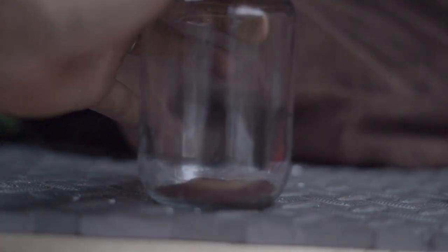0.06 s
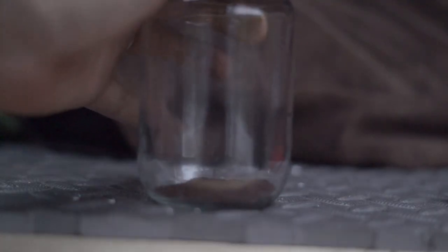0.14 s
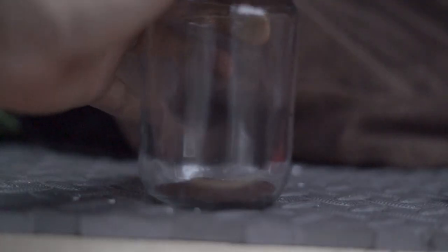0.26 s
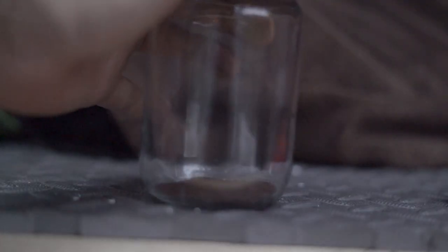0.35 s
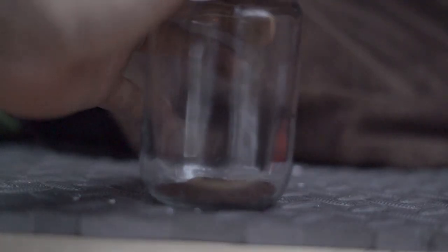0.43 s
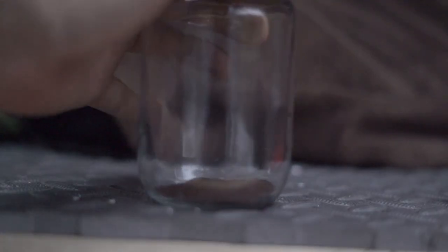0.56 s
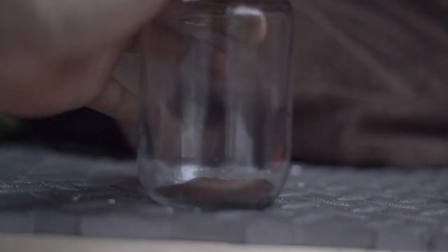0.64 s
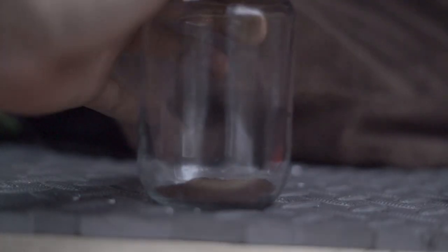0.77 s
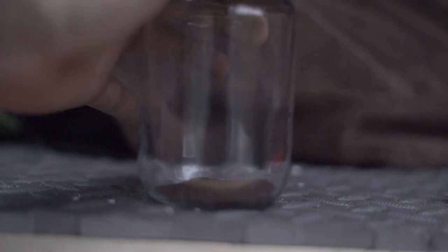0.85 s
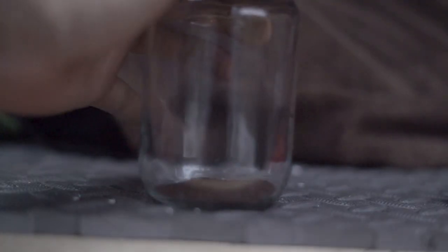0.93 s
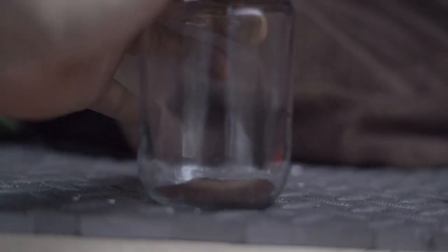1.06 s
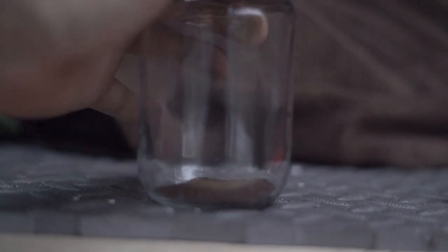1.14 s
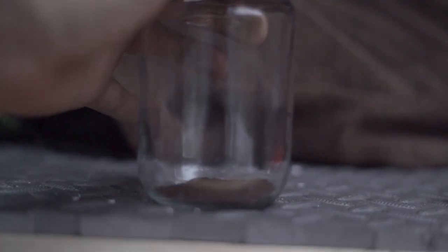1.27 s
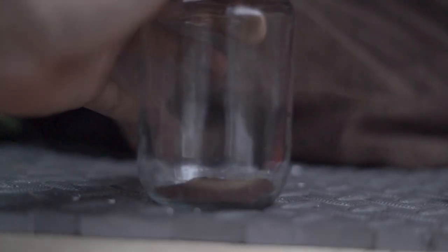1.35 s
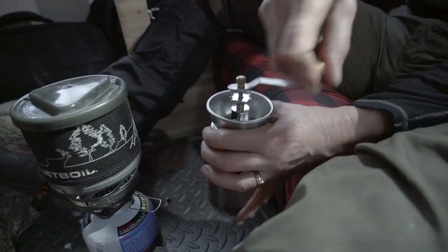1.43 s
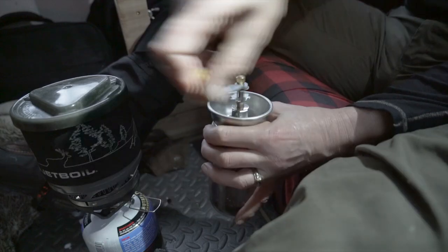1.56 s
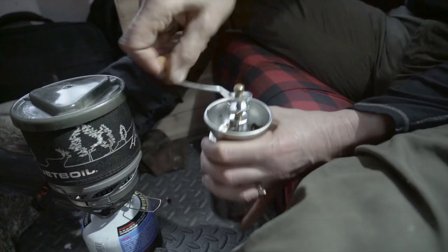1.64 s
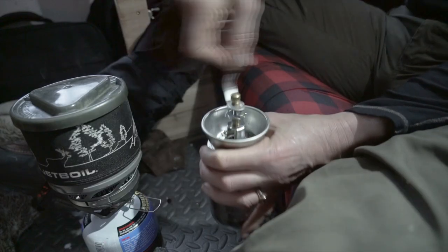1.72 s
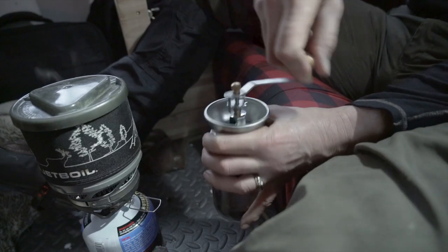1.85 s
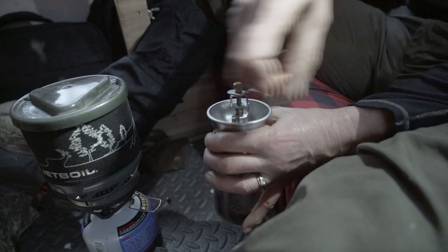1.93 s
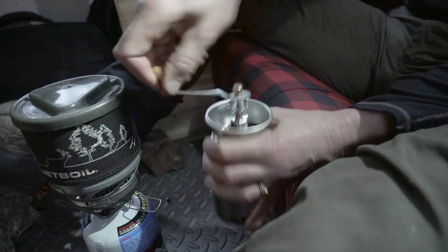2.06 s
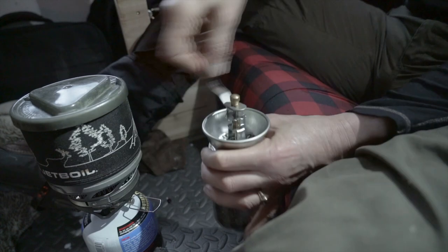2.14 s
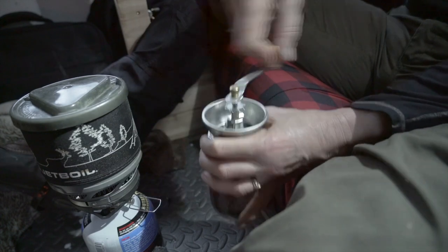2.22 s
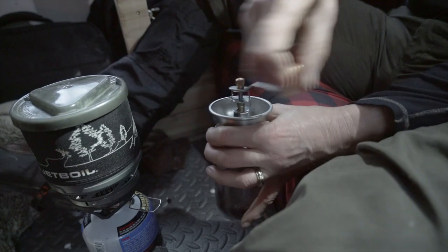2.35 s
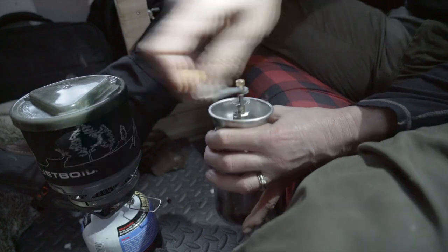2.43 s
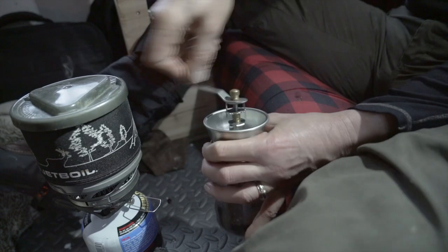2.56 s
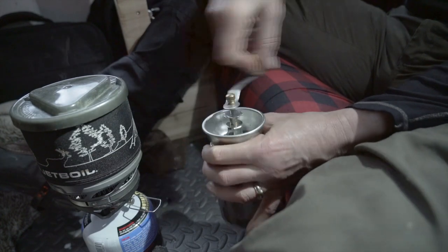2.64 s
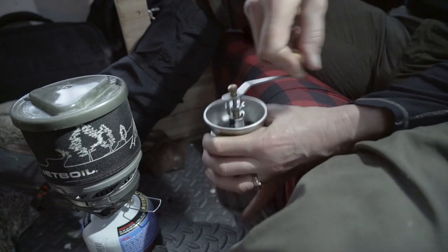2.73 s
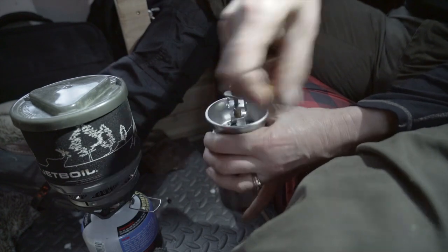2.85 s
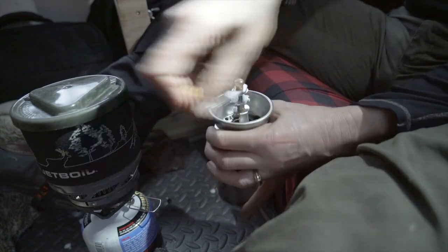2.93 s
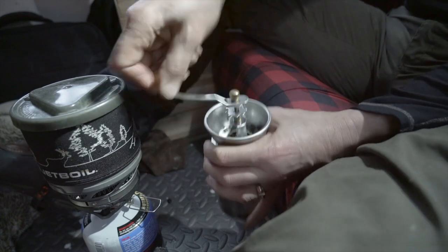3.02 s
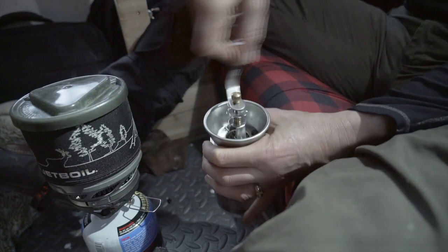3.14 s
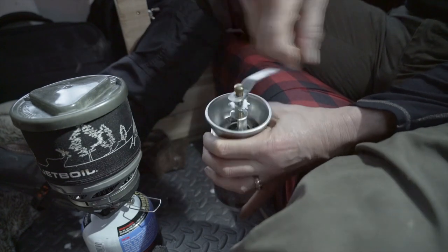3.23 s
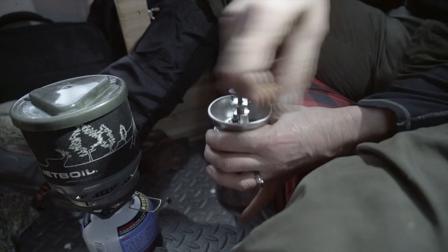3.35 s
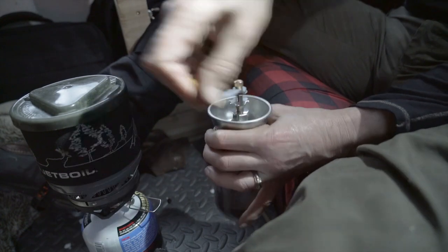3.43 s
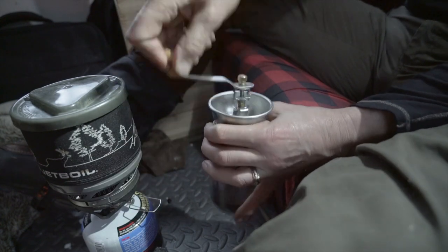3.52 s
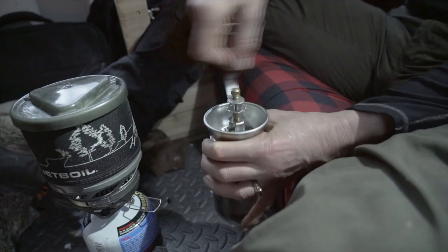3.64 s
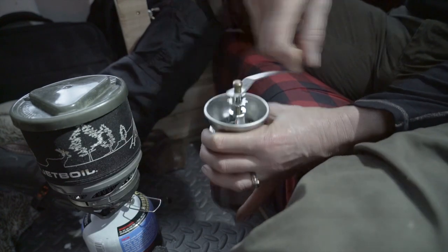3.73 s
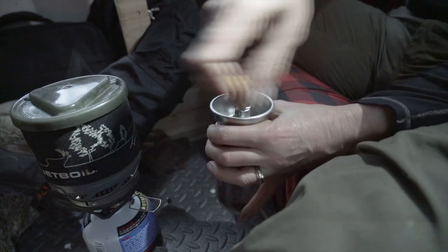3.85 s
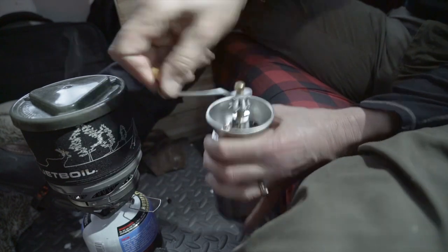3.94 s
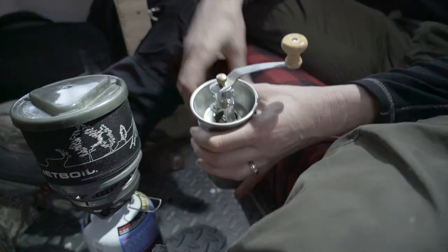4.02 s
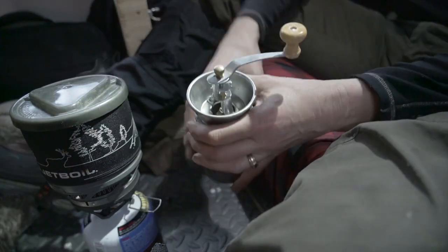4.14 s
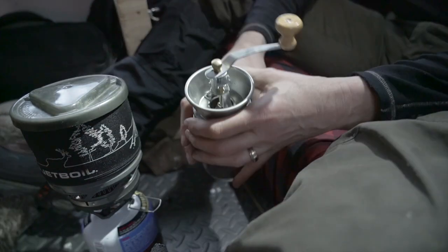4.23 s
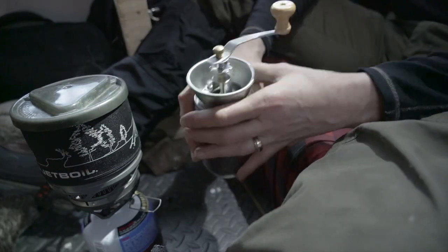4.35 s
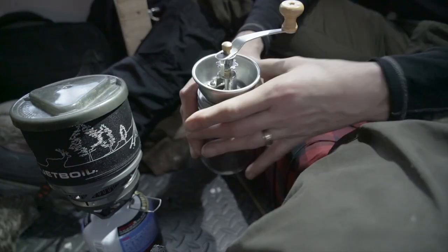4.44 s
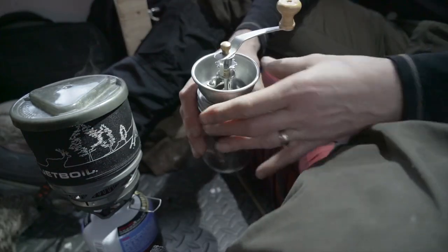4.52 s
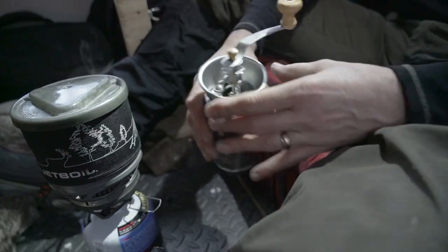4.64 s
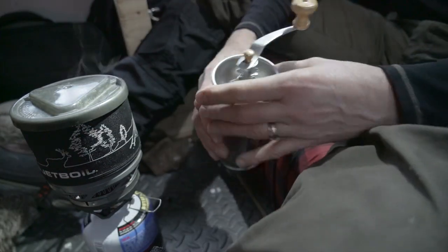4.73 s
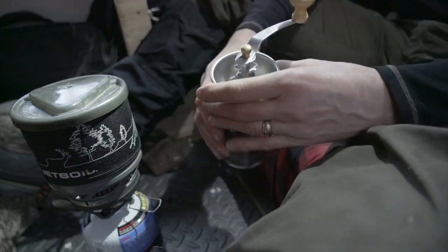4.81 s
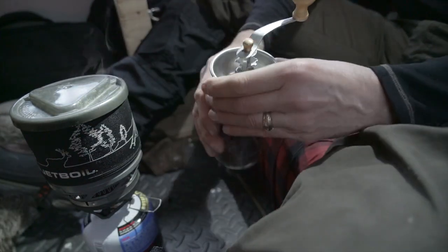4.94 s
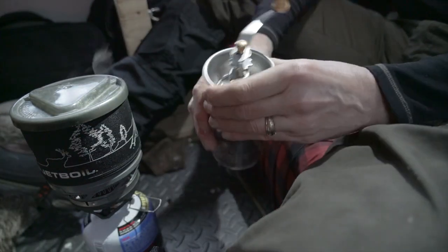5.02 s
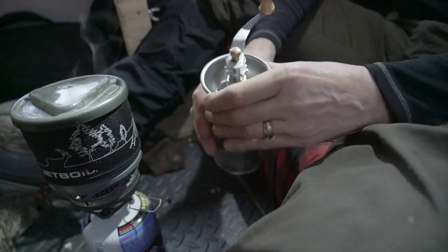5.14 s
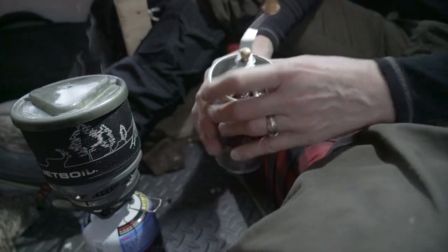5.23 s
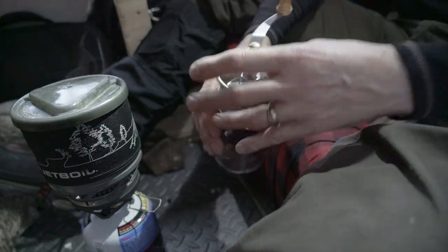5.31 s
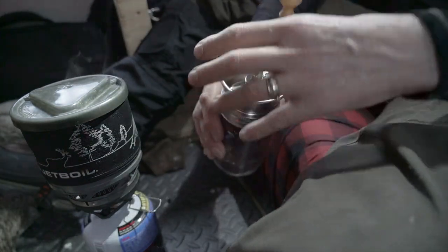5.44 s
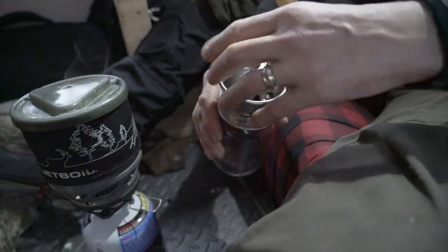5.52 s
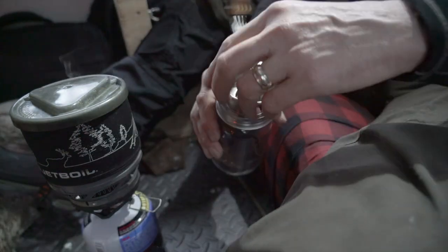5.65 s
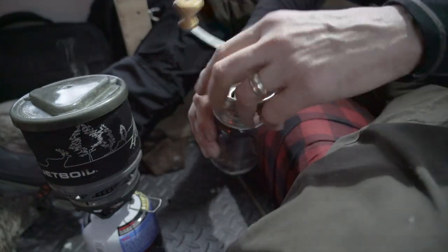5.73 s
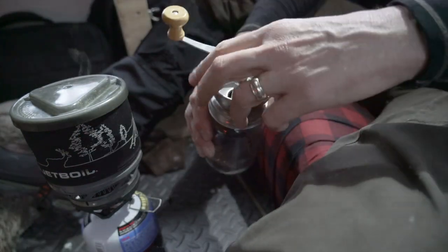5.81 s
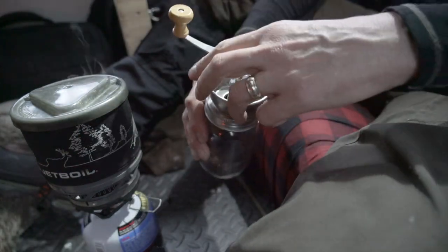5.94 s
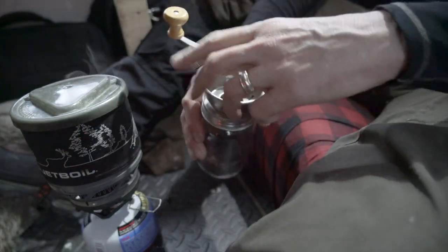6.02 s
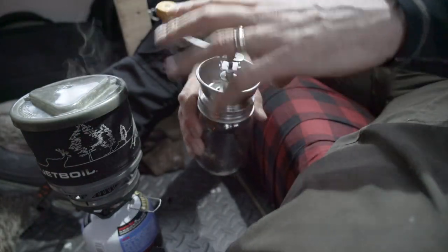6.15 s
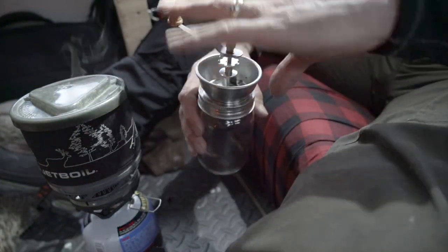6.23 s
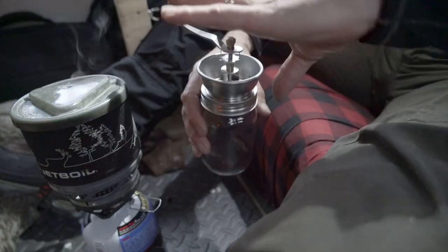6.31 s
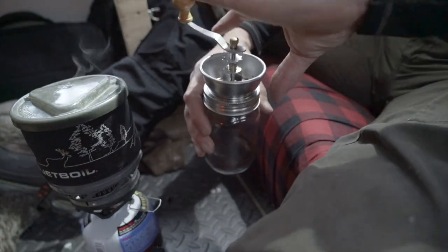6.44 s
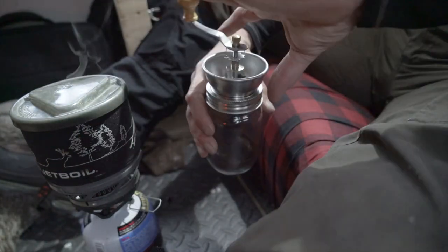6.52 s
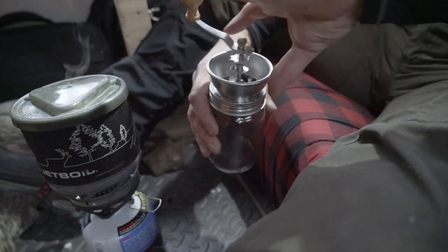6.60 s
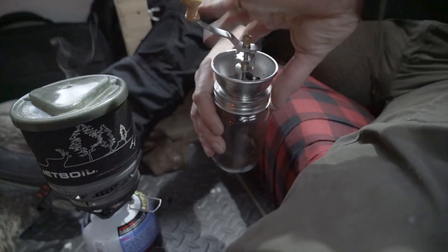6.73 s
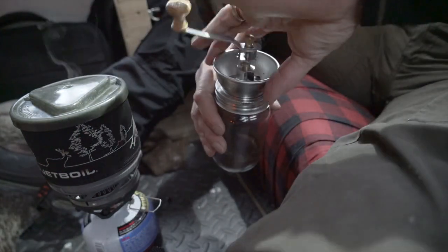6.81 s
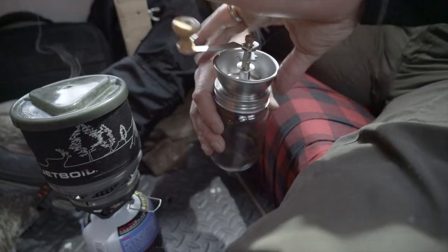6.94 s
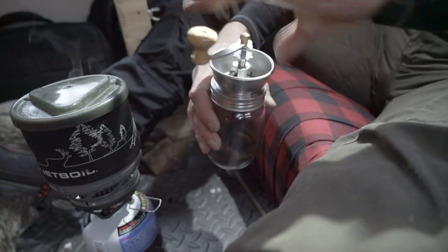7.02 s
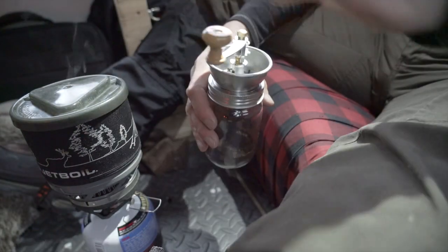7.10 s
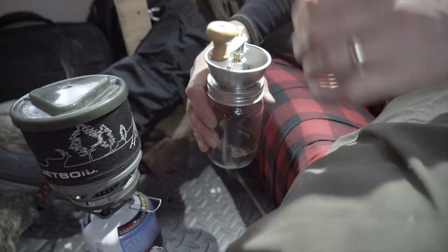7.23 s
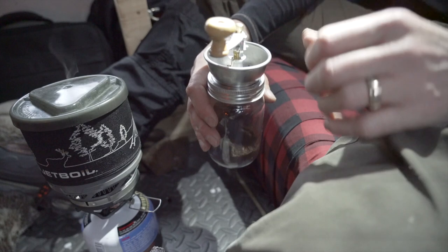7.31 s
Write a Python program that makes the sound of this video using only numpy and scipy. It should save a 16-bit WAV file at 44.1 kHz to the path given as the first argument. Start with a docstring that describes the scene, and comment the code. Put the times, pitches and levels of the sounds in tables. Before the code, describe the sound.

Close by in a small camper with a quiet, steady rumble, coffee beans crunch and snap in a hand mill, the tone wavering with each turn of the crank. The grinding ends a little past halfway, leaving a soft brush of skin and cloth. Then a gritty thread sticks and slips as the metal top twists off the glass jar, which clinks, thuds softly and rings now and then.

```python
"""Grinding coffee in a camper

A hand-crank mill on a glass jar crunches and cracks coffee beans over the camper's low rumble, first
standing on the floor, then held in the lap. Cranking stops, hands and sleeves rustle, and the metal
top is unscrewed in turns: the thread scrapes, the air in the jar thuds, and knocks ring the glass."""
import sys
import numpy as np
from scipy import signal
from scipy.fft import rfft, irfft
from scipy.io import wavfile
from scipy.ndimage import uniform_filter1d

SR = 44100
rng = np.random.default_rng(int(sys.argv[2]) if len(sys.argv) > 2 else 0)


def file_out(sig):
    """Save sig as 16-bit WAV at sys.argv[1]."""
    # one column per channel
    cols = np.atleast_2d(sig).T
    # limit, then scale
    lim = np.clip(cols, -1, 1)
    pcm = np.round(lim * 32767).astype(np.int16)
    wavfile.write(sys.argv[1], SR, pcm)


N = 325017
TIME_S = np.arange(N) / SR
LIFT_S = 1.43  # the mill leaves the floor


def gain_of(db):
    """Turn decibels into a number to multiply by."""
    return 10 ** (np.asarray(db) / 20)

def evened(x):
    """Scale a sound to an average strength (RMS) of 1."""
    return x / np.sqrt(np.mean(x ** 2) + 1e-20)

def drift(size):
    """A random wobble; a bigger size, in samples, makes it slower."""
    return evened(uniform_filter1d(uniform_filter1d(rng.standard_normal(N), size), size))

def wavering(depth_db, size):
    """Noise whose level wavers at random."""
    return rng.standard_normal(N) * gain_of(depth_db * drift(size))

def swell(rise_s, fade_s, count):
    """A quick rise, then a fall. Here and below, fade_s is the time to drop by 60 dB."""
    t = np.arange(count) / SR
    return (1 - np.exp(-t / rise_s)) * gain_of(-60 * t / fade_s)

def colour(x, tone):
    """Make each pitch louder or softer as a tone table says, with no ringing ahead of a hit."""
    pitch_hz, level_db = np.transpose(tone)
    hz = abs(np.fft.fftfreq(8192, 1 / SR))
    curve_db = np.interp(np.log(hz + 1), np.log(pitch_hz + 1), level_db)
    log_gain = np.log(gain_of(np.maximum(curve_db, -90)))
    taps = np.fft.ifft(np.exp(np.conj(signal.hilbert(log_gain)))).real[:4096]
    return signal.oaconvolve(x, taps)[:len(x)]

def resonate(x, hz, width_hz):
    """Ring at one pitch; a narrower width rings longer."""
    r, c = np.exp(-np.pi * width_hz / SR), np.cos(2 * np.pi * hz / SR)
    return signal.lfilter([2 * (1 - r), -2 * (1 - r) * r * c], [1, -2 * r * c, r * r], x)

def glide(x, hz, width_hz):
    """Ring at a moving pitch: shift the sound down, smooth it, shift it back."""
    spin, r = np.exp(2j * np.pi * np.cumsum(hz) / SR), np.exp(-np.pi * width_hz / SR)
    return 2 * (spin * signal.lfilter([1 - r], [1, -r], x / spin)).real

def wandering(x, rings, shift_hz=0):
    """Moving fingers shift and damp each ringing note in its own random way."""
    out = np.zeros(N)
    for hz, width_hz, db in rings:
        strength = gain_of(db + 3 * drift(size=1200))
        pitch_hz = hz * (1 + 0.015 * drift(size=2000)) + shift_hz
        out += strength * evened(glide(x, pitch_hz, width_hz))
    return out

def split(x, at_hz=4900):
    """Separate a sound into its lower body and its treble."""
    filters = (signal.butter(2, at_hz, kind, fs=SR, output="sos") for kind in ("low", "high"))
    return [signal.sosfilt(sos, signal.sosfilt(sos, x)) for sos in filters]

def grains(per_s, spread_db, fade_s, clump_db, alike, kinds=8):
    """Big and small snaps in random clumps; alike is the share that sound like their neighbours."""
    clumps = drift(size=500)
    snaps = gain_of(spread_db * np.minimum(rng.exponential(1, N), 3.5) + clump_db * clumps)
    snaps *= rng.random(N) < per_s / SR
    neighbours = np.repeat(rng.integers(0, kinds, N // 900 + 1), 900)[:N]
    kind = np.where(rng.random(N) < alike, neighbours, rng.integers(0, kinds, N))
    bumps = evened(uniform_filter1d(rng.standard_normal((kinds, 451)), size=9))
    pitched = irfft(rfft(rng.standard_normal((kinds, 900))) * gain_of(2.2 * bumps))
    spectra = rfft(pitched * swell(fade_s / 8, fade_s, 900))
    # each kind favours its own pitches, but together they favour none
    shapes = irfft(spectra / np.sqrt(np.mean(abs(spectra) ** 2, axis=0)))
    shapes /= np.linalg.norm(shapes, axis=1)[:, None]
    return evened(sum(signal.oaconvolve(snaps * (kind == k), shapes[k])[:N] for k in range(kinds)))

def cabin(x, echo_db, fade_s):
    """Add the short, dense echoes of a small padded cabin."""
    t = np.arange(6000) / SR
    tail = rng.standard_normal(6000) * gain_of(-60 * t / fade_s) * (t > .002)
    return x + gain_of(echo_db) * signal.oaconvolve(x, tail / np.linalg.norm(tail))[:N]

def by_place(floor, lap):
    """One value while the mill stands, another once it is lifted."""
    return np.where(np.arange(N) < LIFT_S * SR, floor, lap)


# tone of the camper's background: pitch_hz, level_db
CAMPER_TONE = [(12, -58), (20, 0.5), (150, 4.5), (590, -26), (1660, -24), (2260, -68), (3440, -15.5),
               (5380, -27), (13200, -29), (16000, -65)]
def camper():
    """A steady low rumble with a faint hiss."""
    return gain_of(-52.5) * evened(colour(rng.standard_normal(N), CAMPER_TONE))

# tone of the mill on the floor and in the lap: pitch_hz, level_db
FLOOR_TONE = [(240, -20), (400, -19), (687, -25), (1530, -7.5), (2290, -9.5), (2750, -1.5), (3400, 2.5),
              (4180, -4), (4800, -20.5), (5690, -16.5), (12700, -24), (16000, -35)]
LAP_TONE = [(180, -20), (300, -25.5), (494, -23), (1030, -8), (1900, -4.5), (2140, -5), (3580, 7.5),
            (4020, 1.5), (4910, -8), (8940, -11), (16000, -21)]
# ringing notes of the hopper (the bean holder) and jar: pitch_hz, width_hz, level_db
MILL_RINGS = [(2890, 40, -21), (3085, 35, -20), (3549, 28, -8.5), (4030, 50, -21), (5515, 40, -25),
              (5660, 70, -27), (7865, 45, -29), (9280, 35, -32), (12600, 500, -31), (1430, 43, -30),
              (210, 34, -27.5)]
def hopper_and_jar(x):
    """The mill's body shapes the snaps; in the lap its tone changes and its ringing is damped."""
    standing = by_place(floor=1, lap=0)
    on_floor = 0.45 * evened(colour(x * standing, FLOOR_TONE))
    in_lap = 1.23 * evened(colour(x * (1 - standing), LAP_TONE))
    rings = sum(gain_of(db) * evened(resonate(x, hz, width_hz)) for hz, width_hz, db in MILL_RINGS)
    return on_floor + in_lap + gain_of(by_place(floor=5, lap=-3)) * rings

# how full the grinding teeth are, heard as crunch: time_s, level_db, relative_treble_db
CRUNCH = [(0, -22, -14.5), (0.35, -25, -13.5), (0.44, -27.5, -16), (0.5, -23, -15.5), (0.765, -21.5, -13),
          (0.84, -26.5, -13), (1.015, -26.5, -13), (1.1, -22.5, -12.5), (1.38, -24, -13),
          (1.44, -24, -12.5), (1.68, -23.5, -15.5), (1.74, -28, -17), (1.95, -27.5, -11),
          (2.01, -30.5, -20), (2.115, -25, -10), (2.22, -30.5, -15), (2.3, -30, -13.5), (2.6, -23, -14),
          (2.79, -34.5, -16), (2.87, -25, -14), (2.955, -30, -16), (3.01, -25.5, -14), (3.24, -27, -16),
          (3.29, -26, -8.5), (3.5, -25.5, -17.5), (3.88, -27, -23), (3.95, -26.5, -8), (4.055, -24.5, -24)]
# ringing notes of the hopper gripped in the lap: pitch_hz, width_hz, level_db
GRIP_RINGS = [(3080, 200, -4), (3600, 160, -6), (3900, 140, -8)]
def grinding():
    """Beans crush into grit, fragments and bright chips; in the lap each crank turn bends the ringing."""
    times_s, levels_db, trebles_db = np.transpose(CRUNCH)
    level_db, treble_db = np.interp(TIME_S, times_s, levels_db), np.interp(TIME_S, times_s, trebles_db)
    cranking = uniform_filter1d(1. * (TIME_S <= times_s[-1]), size=90)
    turn_s, hand_nearest_s, swing_hz = 0.49, 2.986, 93
    shift_hz = swing_hz * np.cos(2 * np.pi * (TIME_S - hand_nearest_s) / turn_s)
    grit = grains(per_s=2500, spread_db=2, fade_s=0.01, clump_db=1.33, alike=.6)
    fragments = grains(per_s=300, spread_db=4.5, fade_s=0.0091, clump_db=-3, alike=.6)
    crunch = cabin(grit + gain_of(-6.5) * fragments, echo_db=-15, fade_s=0.07)
    chips = grains(per_s=150, spread_db=2.6, fade_s=0.003, clump_db=3, alike=0)
    chips = cabin(chips, echo_db=-7, fade_s=0.03)
    chips = split(split(chips)[1])[1]  # keep only the treble
    body, treble = split(hopper_and_jar(crunch + gain_of(by_place(floor=-2.5, lap=-2)) * chips))
    gripped = wandering(colour(crunch, LAP_TONE), GRIP_RINGS, shift_hz)
    body = evened(body) + by_place(floor=0, lap=1) * gripped
    return cranking * gain_of(level_db) * (evened(body) + gain_of(treble_db) * evened(treble))

# tone of the low shaking: pitch_hz, level_db
SHAKE_TONE = [(12, -38), (20, -19), (60, 6), (167, -2), (252, -18), (335, -6), (600, -71.5)]
def jar_shake():
    """The cranked jar passes on a lumpy rumble, with one low bump during the last crank turn."""
    cranking = TIME_S < CRUNCH[-1][0]
    level = uniform_filter1d(cranking * gain_of(by_place(floor=-36.5, lap=-53)), size=2000)
    bump_s, half_length_s = 3.8, 0.08
    level += gain_of(-41) * np.exp(-((TIME_S - bump_s) / half_length_s) ** 2)
    return level * evened(colour(wavering(depth_db=3, size=900), SHAKE_TONE))

# the loudest beans breaking: start_s, level_db, relative_treble_db
BEAN_CRACKS = [(0.299, -26, -25), (0.731, -19, -23), (0.759, -9, -15), (1.063, -21, -11.5),
               (1.115, -11.5, -23), (1.176, -13, -2), (1.433, -7, -11), (1.584, -11.5, -9), (1.62, -18, 9),
               (1.668, -10.5, 1.5), (1.688, -14.5, -6), (1.826, -11.5, -10), (1.88, -16, -6),
               (1.902, -14, -8), (1.958, -10, -15), (2.097, -16.5, -10), (2.119, -14, -10),
               (2.252, -15.5, -9), (2.29, -14, -2), (2.646, -13.5, -19), (2.715, -10, -14),
               (2.827, -18, -10), (2.847, -21, -5), (2.879, -14, -17), (2.921, -14, -3), (2.997, -13, -15),
               (3.004, -7.5, -10.5), (3.035, -13.5, -7), (3.216, -10, -17), (3.274, -19.5, 5),
               (3.4, -17.5, -25), (3.458, -9, -12), (3.49, -20, -4), (3.563, -6, -13), (3.943, -15, -4),
               (3.962, -13.5, -9), (3.988, -13, -4)]
def bean_cracks():
    """A whole bean splits: a short, rough burst through the mill, with a quicker rise in the treble."""
    out, count = np.zeros(N), 1500
    bursts = rng.standard_normal((len(BEAN_CRACKS), count))
    for (start_s, level_db, treble_db), burst in zip(BEAN_CRACKS, bursts):
        body = split(colour(burst * swell(0.00092, 0.011, count), LAP_TONE))[0]
        treble = split(colour(burst * swell(0.00043, 0.011, count), LAP_TONE))[1]
        crack = body / abs(body).max() + gain_of(treble_db) * treble / abs(treble).max()
        out[round(start_s * SR):][:count] += gain_of(level_db) * crack
    return cabin(out, echo_db=-11, fade_s=0.05)

# jolts that make the air in the jar boom: start_s, level_db, pitch_hz
JAR_THUDS = [(0.763, -29, 328), (5.015, -36, 157), (5.071, -36, 200), (5.271, -36, 207), (5.331, -36, 252),
             (5.546, -34, 191), (5.732, -26.5, 202), (5.775, -30, 210), (5.825, -29.5, 163),
             (5.887, -35, 194), (6.196, -29, 203), (6.229, -26.5, 206), (6.292, -31, 190),
             (6.333, -33, 166), (6.463, -36, 204), (6.551, -34, 173), (6.614, -21.5, 164),
             (6.631, -28, 205), (6.816, -27.5, 235), (6.923, -32.5, 178), (6.996, -29.5, 206),
             (7.048, -27.5, 220), (7.156, -36, 235)]
def jar_thuds():
    """The jolted air sounds a low note that dies fast, plus a shorter, hollow one."""
    count, hollow_hz = 4000, 563
    out, t = np.zeros(N + count), np.arange(count) / SR
    hollow = gain_of(-6) * swell(0.0013, 0.023, count) * np.sin(2 * np.pi * hollow_hz * t)
    for start_s, level_db, pitch_hz in JAR_THUDS:
        boom = swell(0.001, 0.14, count) * np.sin(2 * np.pi * pitch_hz * t)
        out[round(start_s * SR):][:count] += gain_of(level_db) * (hollow + boom)
    return out[:N]

# tone of rubbing cloth: pitch_hz, level_db
CLOTH_TONE = [(290, -38), (500, -15), (831, -10), (1300, -3), (1420, -5), (3650, 3), (4300, -3), (5000, -6),
              (16000, -22.5)]
# skin and sleeves brushing: middle_s, half_length_s, level_db
SLEEVE_BRUSHES = [(4.22, 0.17, -56.5), (4.528, 0.09, -50), (7.174, 0.044, -53), (7.37, 0.08, -58.5)]
def rustle():
    """Once the crank stops, skin and cloth rub faintly; each brush swells and sinks smoothly."""
    start_s, steady_db = 4.056, -61.5
    brushes = sum(gain_of(db) * np.exp(-((TIME_S - middle_s) / half_s) ** 2)
                  for middle_s, half_s, db in SLEEVE_BRUSHES)
    rubbing = evened(colour(wavering(depth_db=1.8, size=300), CLOTH_TONE))
    return (TIME_S > start_s) * (gain_of(steady_db) + brushes) * rubbing

# metal knocking on the jar: start_s, level_db, pitch_hz
METAL_KNOCKS = [(4.274, -47, 1720), (4.306, -47, 1790), (4.78, -44, 2880), (4.835, -38.5, 1730),
                (4.908, -45.5, 1980), (5.011, -20, 3520), (5.022, -15, 3540), (5.068, -28, 3160),
                (5.09, -22, 2270), (5.188, -44.5, 1820), (5.303, -42, 2000), (5.343, -37, 3160),
                (5.374, -38.5, 1670), (5.55, -46.5, 1190), (5.582, -41, 1620), (5.772, -33, 3320),
                (5.844, -34, 2116), (6.188, -27.5, 3280), (6.23, -40, 3350), (6.292, -28, 3350),
                (6.323, -30, 3500), (6.333, -13, 3480), (6.495, -52, 3470), (6.549, -38, 3320),
                (6.611, -35, 2830), (6.619, -16.5, 2130), (6.622, -19, 3070), (6.772, -37, 2620),
                (6.817, -29.5, 3280), (6.829, -24.5, 2550), (6.859, -34, 2930), (6.93, -26.5, 3100),
                (6.998, -21, 2780), (7.12, -40, 2000)]
# ringing notes of the glass and of the metal top: pitch_hz, level_db, fade_s
GLASS_NOTES = [(1324, -11, .38), (3531, 0, .41)]
TOP_NOTES = [(1730, -2, 0.041), (2780, 4, 0.032), (3280, -7, 0.047), (6460, 0, 0.021), (9200, -1.5, 0.028)]
# tone of metal scraping on the jar: pitch_hz, level_db
SCRAPE_TONE = [(260, -6.5), (450, 0), (700, -2), (1100, 1.5), (2260, 1.5), (2580, 2.5), (3490, 6),
               (4910, -8), (5790, -8.5), (12200, -11.5), (16000, -23)]
# moments when the fingers let the glass ring: start_s, end_s, level_db
LOOSE_GRIPS = [(5.1, 5.26, -52), (6.345, 6.53, -47), (6.63, 6.79, -31)]
def metal_knocks():
    """Dry, rough-edged ticks ring the metal top; the glass rings on only while the grip is loose."""
    out, t, count = np.zeros(N + SR // 2), np.arange(SR // 2) / SR, 2000
    glass = sum(gain_of(db - 60 * t / fade_s) * np.sin(2 * np.pi * hz * t)
                for hz, db, fade_s in GLASS_NOTES)
    top = np.array([gain_of(db) * swell(0.000096, fade_s, count) * np.sin(2 * np.pi * hz * t[:count])
                    for hz, db, fade_s in TOP_NOTES])
    noises = rng.standard_normal((len(METAL_KNOCKS), count))
    for (start_s, level_db, hz), noise in zip(METAL_KNOCKS, noises):
        fade_s = 0.056 * (hz / GLASS_NOTES[1][0]) ** 0.8
        tick = swell(0.00087, fade_s, count) * evened(resonate(resonate(noise, hz, 540), hz, 540))
        edge = swell(0.00042, 0.003, count) * evened(colour(noise, SCRAPE_TONE))
        edge_db = -0.5 - 0.38 * (level_db + 29)  # soft knocks are rougher
        top_db = -8 - 13.5 * np.log2(hz / TOP_NOTES[0][0])  # high ticks hit glass and ring the top less
        spot_db = 4.5 * noise[-len(TOP_NOTES):]  # each spot struck favours other notes
        knock = gain_of(-34 - 280 * t) * glass  # damped by the hand
        knock[:count] += tick / abs(tick).max() + gain_of(edge_db) * edge / abs(edge).max()
        knock[:count] += gain_of(top_db + spot_db) @ top
        out[round(start_s * SR):][:len(t)] += gain_of(level_db) * knock
    for start_s, end_s, level_db in LOOSE_GRIPS:
        loose = np.clip((end_s - start_s - t) / 0.04, 0, 1)
        out[round(start_s * SR):][:len(t)] += gain_of(level_db) * glass * loose
    return cabin(out[:N], echo_db=-11, fade_s=0.047)

# the thread slipping as the top is twisted: start_s, build_s, slide_s, level_db, relative_treble_db
THREAD_SLIPS = [(4.99, 0.016, 0.085, -39, -6), (5.247, 0.0041, 0.08, -50, -7),
                (5.323, 0.012, 0.015, -39, -5), (5.614, 0.058, 0.041, -37, 0.5),
                (5.802, 0.033, 0.0025, -37, -12), (5.87, 0.014, 0.032, -52, -17),
                (6.186, 0.002, 0.0028, -39, 5), (6.2, 0.013, 0.04, -43.5, -10.5),
                (6.285, 0.043, 0.0023, -43.5, 0), (6.456, 0.0034, 0.0066, -50, -11),
                (6.537, 0.01, 0.0032, -42, -7), (6.603, 0.014, .003, -33.5, -7.5),
                (6.764, 0.058, 0.0043, -38, -6), (6.85, 0.017, 0.046, -37.5, -3.5),
                (6.945, 0.067, 0.0051, -31, -2.5)]
def twisting():
    """The scrape's level, treble and on/off: each slip builds, slides and fades; the loudest leads."""
    build_db, fade_db_per_s = 19.5, 427
    level_db, treble_db = np.full(N, -90.5), np.full(N, -6.)  # the hand resting between slips
    rest_db = level_db[0]
    for start_s, build_s, slide_s, slide_db, bright_db in THREAD_SLIPS:
        rise_db = np.minimum(build_db * ((TIME_S - start_s) / build_s - 1), 0)
        fall_db = fade_db_per_s * (start_s + build_s + slide_s - TIME_S)
        slip_db = slide_db + np.minimum(rise_db, fall_db)
        treble_db = np.where(slip_db > level_db, bright_db, treble_db)
        level_db = np.maximum(level_db, slip_db)
    begun = TIME_S > THREAD_SLIPS[0][0]
    unfinished = (TIME_S < THREAD_SLIPS[-1][0]) | (level_db > rest_db)
    return level_db, treble_db, uniform_filter1d(1. * begun * unfinished, size=90)

# ringing notes of the metal top while it turns: pitch_hz, width_hz, level_db
TURNING_RINGS = [(3540, 23, -8), (3900, 83, -11), (5810, 170, -16), (8010, 110, -17)]
def thread_scrape():
    """The gritty thread sticks and slips, ringing the metal top and shaking the air in the jar."""
    level_db, treble_db, turning = twisting()
    grit = grains(per_s=3000, spread_db=3.2, fade_s=0.0039, clump_db=2, alike=.3)
    hz, width_hz, db = TURNING_RINGS[0]  # this note holds steady, the others wander
    rings = gain_of(db) * evened(resonate(grit, hz, width_hz)) + wandering(grit, TURNING_RINGS[1:])
    body, treble = split(evened(colour(grit, SCRAPE_TONE)) + rings)
    scrape = turning * gain_of(level_db) * (evened(body) + gain_of(treble_db) * evened(treble))
    boom = evened(resonate(resonate(grit, hz=204, width_hz=174), hz=204, width_hz=174))
    boom *= turning * gain_of(0.5 * level_db - 22.5)  # the boom grows less than the scrape
    return scrape + resonate(boom, hz=290, width_hz=105)


def scene():
    """Add all the sounds into one channel."""
    mill = grinding() + bean_cracks() + jar_shake()
    return (mill + rustle() + thread_scrape() + jar_thuds() + metal_knocks() + camper())[None]

def record(dry):
    """Cut off the very highest treble."""
    cutoff_hz = 15800
    taps = signal.firwin(1023, cutoff_hz, window=("kaiser", 10), fs=SR)
    return signal.oaconvolve(dry, taps[None], "same")


dry = scene()
out = record(dry)
file_out(out)
```